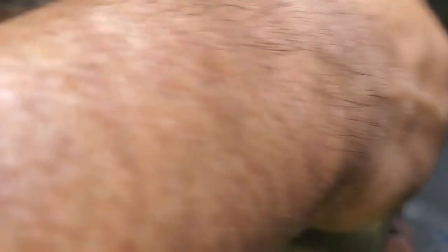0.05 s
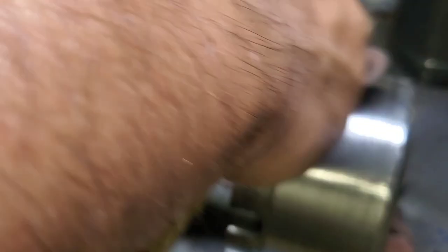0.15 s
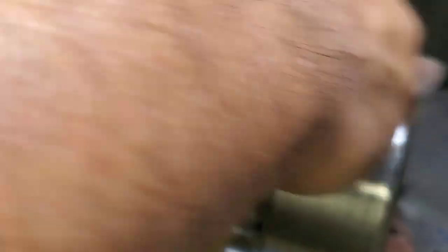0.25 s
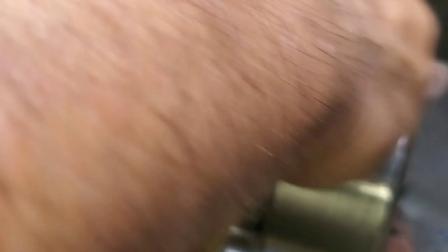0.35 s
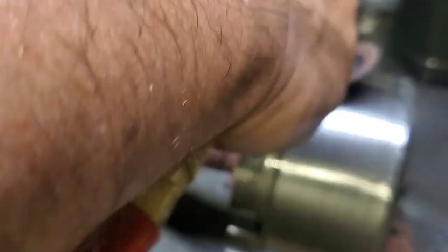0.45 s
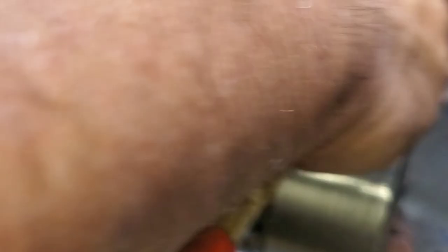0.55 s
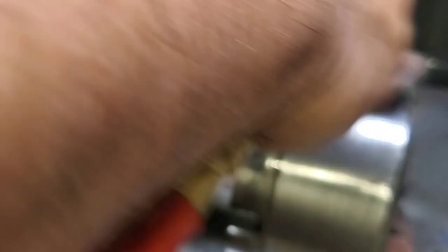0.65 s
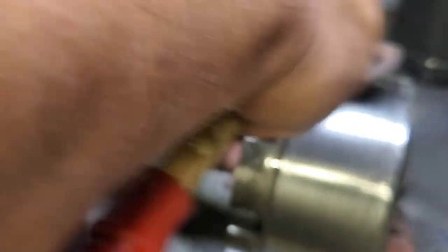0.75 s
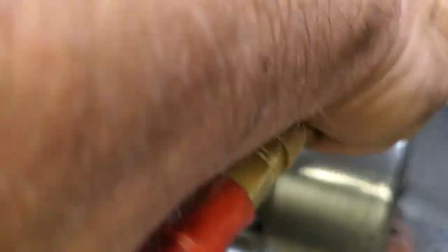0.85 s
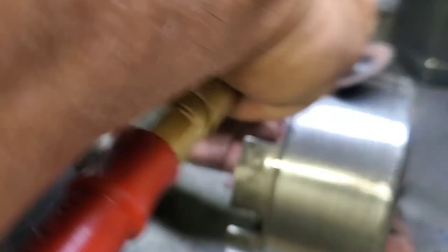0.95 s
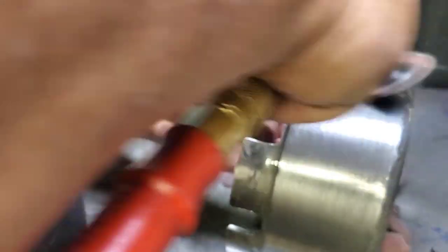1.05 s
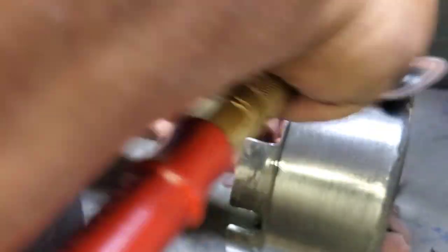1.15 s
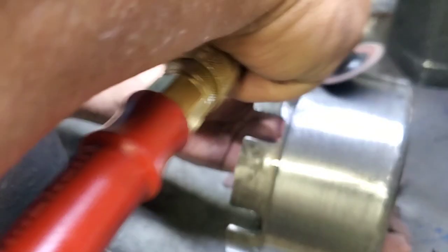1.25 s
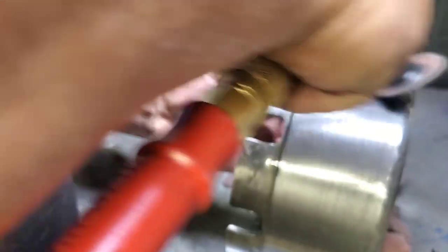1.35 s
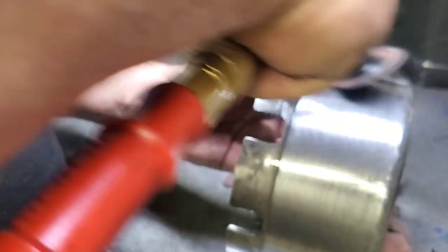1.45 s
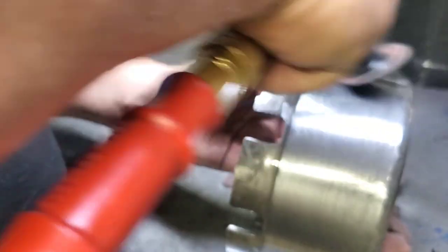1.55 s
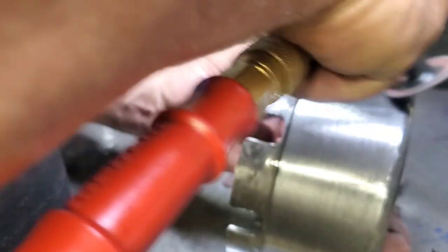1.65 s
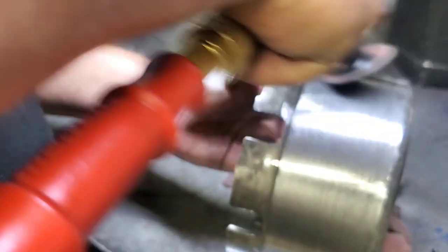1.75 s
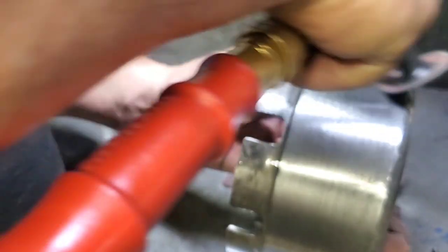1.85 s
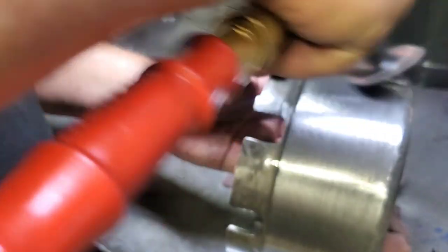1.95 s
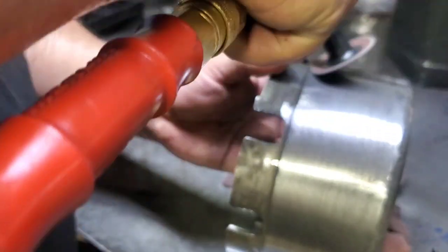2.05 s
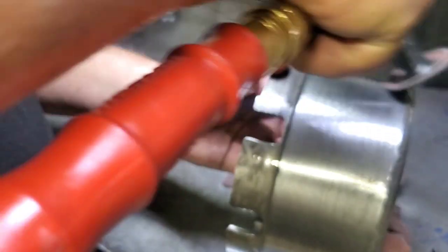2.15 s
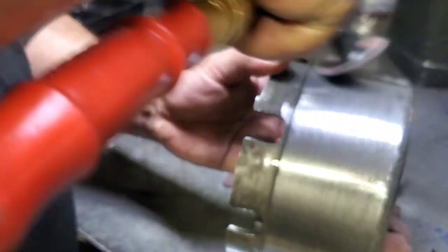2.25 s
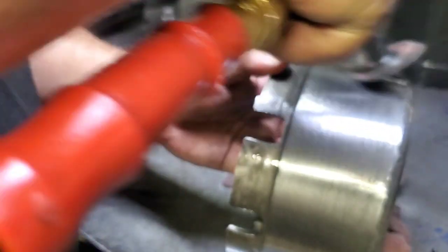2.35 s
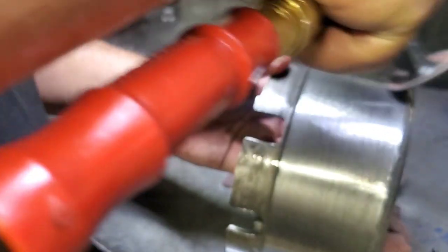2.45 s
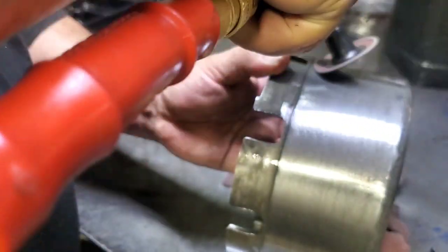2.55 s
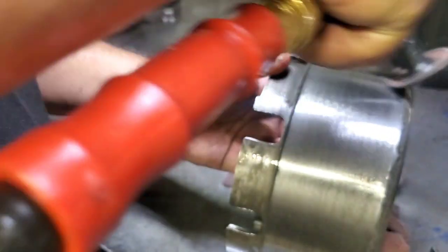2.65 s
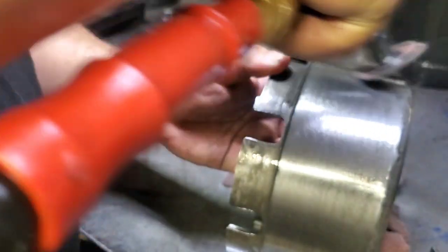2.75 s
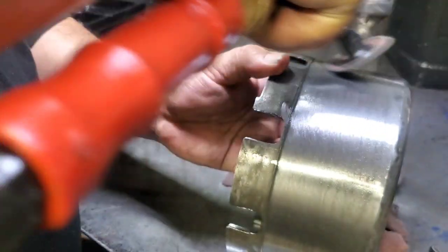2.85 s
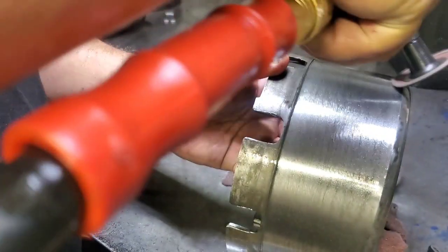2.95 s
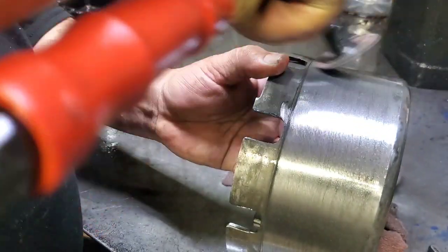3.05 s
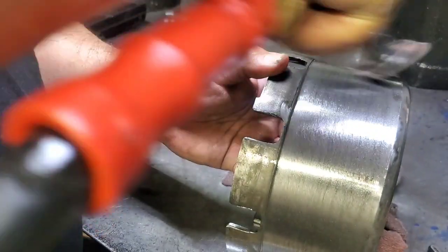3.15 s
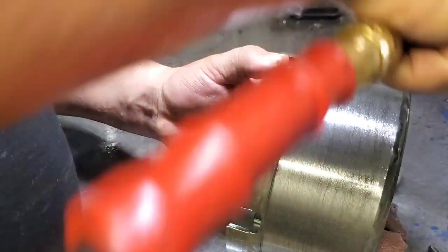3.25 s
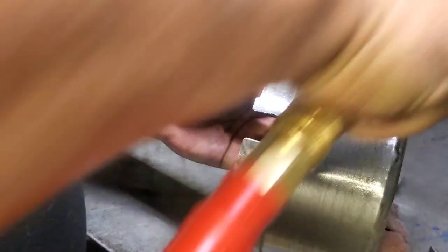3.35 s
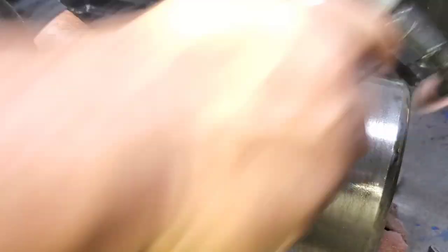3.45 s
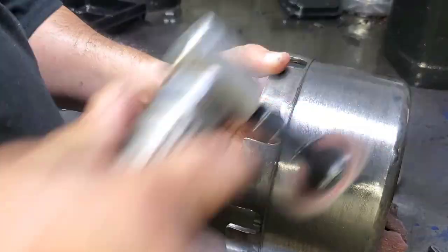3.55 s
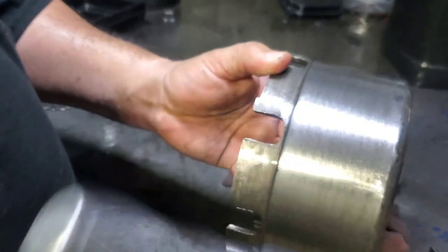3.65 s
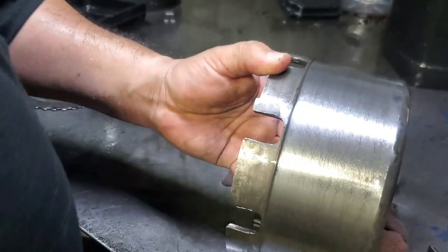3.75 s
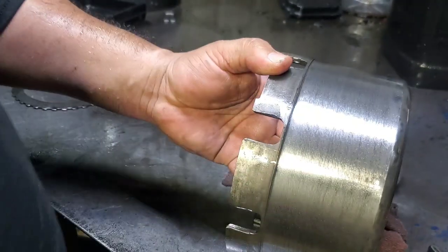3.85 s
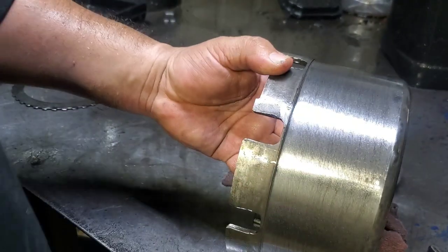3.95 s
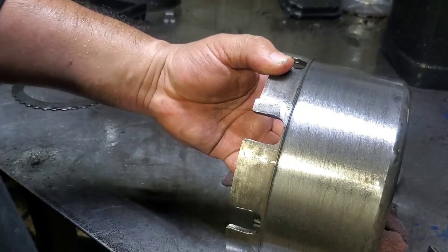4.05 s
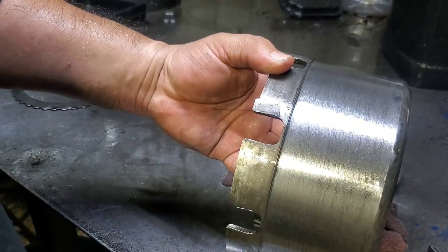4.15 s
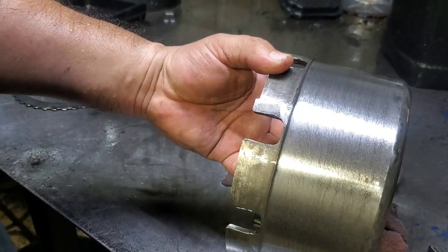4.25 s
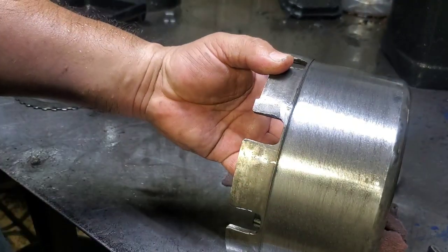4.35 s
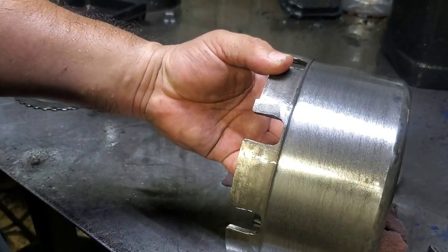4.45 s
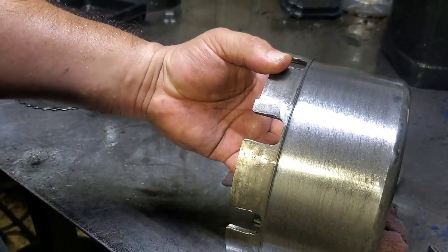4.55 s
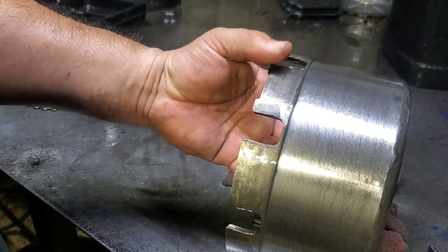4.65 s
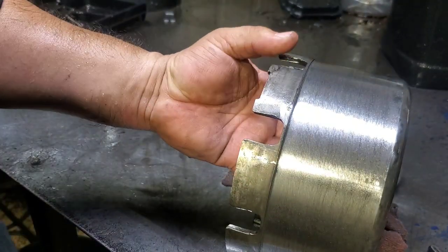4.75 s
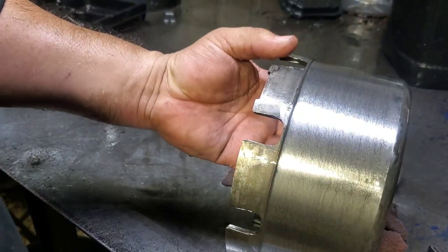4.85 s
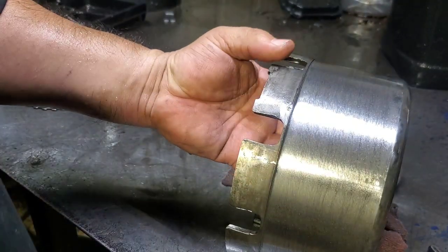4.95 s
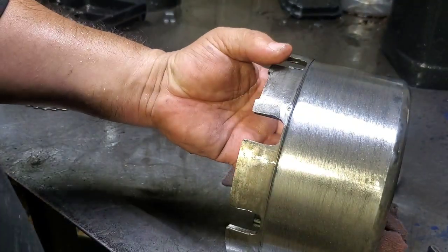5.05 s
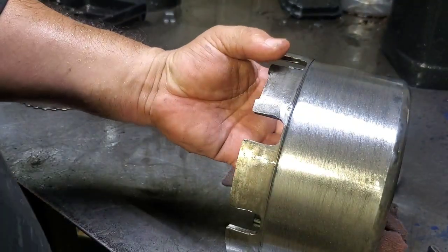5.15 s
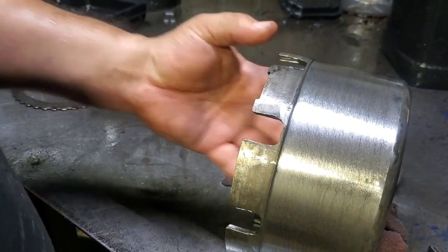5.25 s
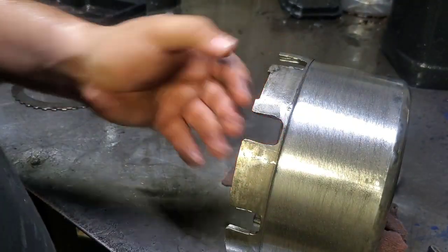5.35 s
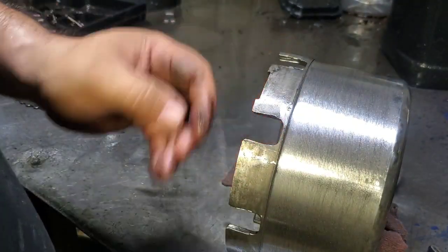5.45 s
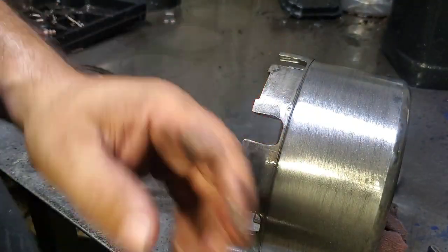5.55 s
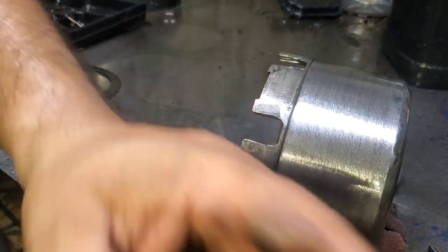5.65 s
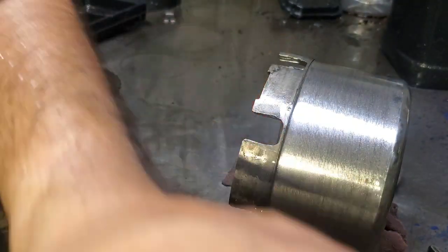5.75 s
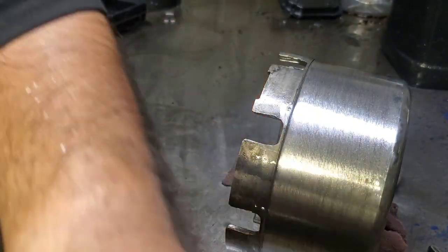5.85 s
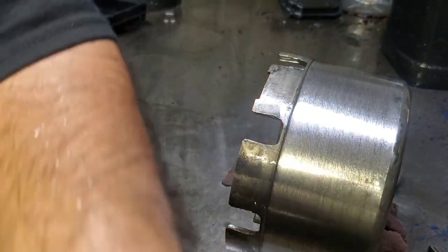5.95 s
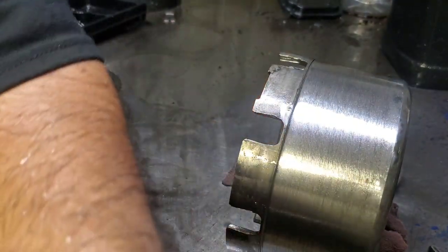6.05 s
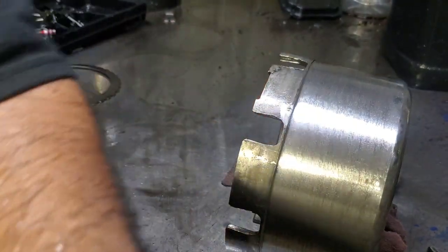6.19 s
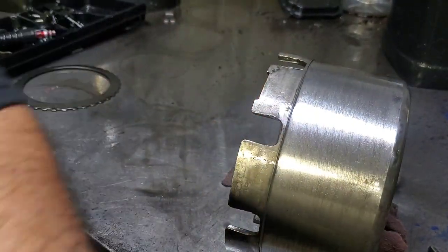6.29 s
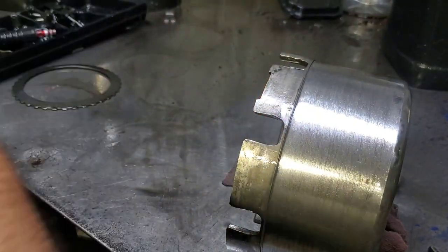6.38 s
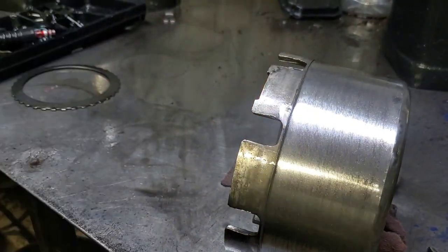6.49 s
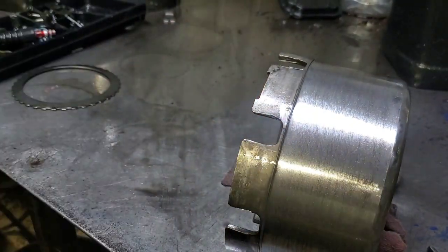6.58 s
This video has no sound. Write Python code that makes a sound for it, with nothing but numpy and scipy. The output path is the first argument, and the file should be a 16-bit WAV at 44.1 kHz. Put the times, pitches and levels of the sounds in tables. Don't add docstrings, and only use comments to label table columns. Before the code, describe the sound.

In a workshop, a hand-held air grinder sands a metal drum very close to the microphone, its raspy whine dipping in pitch with each press amid strong air hiss. After three seconds it is released, coasting down with a fading, spitting bleed. Steady leak hiss and low rumble emerge, then the tool is laid on the bench and slides grittily.

```python
import sys
import numpy as np
from scipy import signal
from scipy.fft import rfft, irfft
from scipy.io import wavfile
from scipy.ndimage import uniform_filter1d

SR = 44100
rng = np.random.default_rng(int(sys.argv[2]) if len(sys.argv) > 2 else 0)


def inscribe(sig):
    pcm = np.round(np.clip(np.atleast_2d(sig).T, -1, 1) * 32767)
    wavfile.write(sys.argv[1], SR, pcm.astype(np.int16))


def boost_factor(decibels):
    exponent = np.asarray(decibels, float) / 20
    return 10 ** exponent


N = 291942
T = np.arange(N) / SR
HZ = np.maximum(np.arange(N // 2 + 1) * SR / N, 1)
RELEASE_S, VALVE_S = 3.307, 0.0094


def rms_one(x):
    return x / np.sqrt(np.mean(x ** 2) + 1e-20)


def at_hz(points, hz):
    f, level = np.transpose(points)
    return np.interp(np.log(hz), np.log(f), level)


def step(s, span):
    return .5 + .5 * np.tanh((T - s) / span / 2)


def after(s):
    return np.maximum(T - s, 0)


def swells(rows):
    return sum(boost_factor(db) * np.exp(-.5 * ((T - s) / length) ** 2) for s, db, length in rows)


def drift(rate):
    r = np.exp(-80 * np.pi * rate / SR)
    white = rng.standard_normal(N // 40 + 2002)
    slow = signal.lfilter([1], [1, -2 * r, r * r], white)[2000:]
    return np.interp(np.arange(N) / 40, np.arange(len(slow)), rms_one(slow))


def peaks(modes, hz):
    return np.sqrt(sum(boost_factor(db) ** 2 / (1 + ((hz - f * f / hz) / w) ** 2) for f, w, db in modes))


def colour(spectrum):
    return boost_factor(at_hz(spectrum, np.minimum(HZ, 15200)))


def noise(gain, balance, likeness, lag, patchy_db, rate, count=1):
    shared, left, right = rfft(rng.standard_normal((3, N)))
    alike = np.clip(at_hz(likeness, HZ), 0, 1)
    late = shared * np.exp(-2j * np.pi * HZ * lag / SR)
    pair = np.sqrt(alike) * np.array([shared, late]) + np.sqrt(1 - alike) * np.array([left, right])
    pair = pair * gain * boost_factor(at_hz(balance, HZ) / 2 * np.array([[1], [-1]]))
    share = gain ** 2 / np.sum(gain ** 2)
    place, out = count * np.log2(HZ), 0
    for band in range(4 * count, 15 * count):
        mask = np.clip(1 - np.abs(place - band), 0, 1)
        if mask @ share > 1e-4:
            out = out + irfft(pair * mask, N) * boost_factor(patchy_db * drift(rate))
    return out / np.sqrt(np.mean(np.mean(out, axis=0) ** 2))


# t/s, level/dB, length/s
COMPRESSOR_SWELLS = [(0.25, -56, .22), (1.12, -56, .12), (1.92, -54, .1), (2.86, -62, .05),
                     (3.8, -53, 0.12), (4.15, -59, 0.12), (4.79, -38.5, .1), (5.08, -51, .07),
                     (5.5, -51, 0.11), (6.05, -45, 0.044), (6.5, -34, .09)]


def drone():
    swelling = boost_factor(-69.5) + swells(COMPRESSOR_SWELLS)
    hz = 32.6 + 1.47 * drift(4)
    return swelling * boost_factor(0.81 * drift(5)) * np.cos(2 * np.pi * np.cumsum(hz) / SR)


# f/Hz, level/dB against the hiss, wander/Hz
MACHINE_TONES = [(1020, -10.5, 2.1), (2030, -33, 6.03), (2810, -8, 14.7)]


def tones():
    out = 0
    for hz, db, wander_hz in MACHINE_TONES:
        phase = 2 * np.pi * np.cumsum(hz + wander_hz * drift(6.3)) / SR
        right_lag = 2 * np.pi * hz * 8.0 / SR
        out = out + boost_factor(db + 0.7 * drift(12)) * np.cos(phase - np.array([[0], [right_lag]]))
    return out * boost_factor([[1.5], [-1.5]])


# f/Hz, level/dB per Hz
LEAK_HISS = [(94, -47), (160, -4.5), (363, -6.5), (456, -12.5), (590, -12.5), (646, -6), (972, -6.5),
             (1050, -2), (1170, -7), (1600, -2.5), (2010, -0.5), (2770, -1.5), (3480, -6), (3980, -1),
             (6000, -20), (7800, -52), (13200, -120)]
# f/Hz, level/dB per Hz
LEAK_TREBLE = [(2940, -36), (5000, -1.5), (5690, -5.5), (6940, 1.5), (8050, -5.5), (9000, 1), (9760, -4),
               (11800, -2.5), (14100, -4.5), (15100, 0.5), (15800, -21)]
# f/Hz, level/dB per Hz
BUILDING_RUMBLE = [(26, -33), (45, 4.5), (97, 4), (113, -2), (135, -5.5), (200, -9), (260, -45.5),
                   (440, -120)]
# f/Hz, L-R level/dB
ROOM_BALANCE = [(60, -2), (110, -0.5), (200, 1.5), (380, 4), (700, 1.5), (1290, 1), (2380, 4.5),
                (4400, 3.5), (8120, 7), (15000, 6.5)]
# f/Hz, likeness/1
ROOM_LIKENESS = [(60, 1), (300, 0.95), (700, 0.4), (1400, 0.78), (3000, 0.17), (7000, 0.21), (15000, .2)]


def shop():
    recover_s, shade_s = 4.585, 6.15
    gain_db = -21.5 * (1 - step(recover_s, 0.15)) - 13 * (1 - step(3.57, 0.064))
    hiss = noise(colour(LEAK_HISS), ROOM_BALANCE, ROOM_LIKENESS, lag=13.0, patchy_db=1.5, rate=5.0, count=3)
    high = noise(colour(LEAK_TREBLE), ROOM_BALANCE, ROOM_LIKENESS, lag=12.5, patchy_db=0.3, rate=6.1, count=3)
    rumble = noise(colour(BUILDING_RUMBLE), ROOM_BALANCE, ROOM_LIKENESS, lag=3.2, patchy_db=4.0, rate=3.1)
    high_db = -37 - 14 * after(shade_s)
    rumble_db = -42.5 + 1.5 * after(recover_s)
    mix = boost_factor(-36.0) * (hiss + tones()) + boost_factor(high_db) * high + boost_factor(rumble_db) * rumble
    held_rumble = boost_factor(-61.5) * step(RELEASE_S, VALVE_S) * rumble
    return boost_factor(gain_db) * mix + held_rumble


# t/s, level/dB, centre f/Hz, length/s
BENCH_BUMPS = [
    (5.79, -34.5, 1100, 0.028),
    (6.37, -39, 170, 0.013),
    (6.372, -38.5, 800, .012),
    (2.4, -58, 138, .02),
]
# t/s, length/s, level/dB
BENCH_SLIDES = [
    (5.825, 0.21, -39),
    (6.015, 0.31, -39),
    (6.4, .3, -57),
]
# f/Hz, width/Hz, level/dB
BENCH_MODES = [(1750, 91, 2.5), (2003, 71, 2.5), (2760, 110, -1.5), (2980, 48, 1.5), (2300, 150, -7),
               (373, 17, 0)]


def bench():
    out = 0
    for s, db, hz, length in BENCH_BUMPS:
        gain = peaks([(hz, 1.7 * hz, 0)], HZ) ** 2.5
        body = noise(gain, ROOM_BALANCE, ROOM_LIKENESS, lag=6, patchy_db=2, rate=40)
        out = out + swells([(s, db, length)]) * body
    edge_s, stroke = 0.014, 0
    for s, length, db in BENCH_SLIDES:
        stroke = stroke + boost_factor(db) * (step(s, edge_s) - step(s + length, edge_s))
    balance = [(1000, 7.3), (4000, 5)]
    grit = noise(peaks(BENCH_MODES, HZ) ** 2, balance, ROOM_LIKENESS, lag=15.0, patchy_db=-0.5, rate=81)
    return out + stroke * grit


# f/Hz, level/dB per Hz
FACING_AIR = [(120, -61), (200, -34), (273, -14), (393, -18), (567, -21), (668, -22), (719, -8),
              (879, -15.5), (1760, 2), (2360, -7), (3340, -1), (4730, -11), (5780, -6), (6940, -16),
              (15800, -13.5)]
# f/Hz, level/dB per Hz
AWAY_AIR = [(120, -59), (200, -30.5), (517, -29.5), (621, -15.5), (817, -17), (1160, -14), (2190, -6),
            (2730, -2.5), (3160, -11.5), (4080, -10), (4730, -19), (5180, -34), (11400, -21.5),
            (13400, -39), (15800, -19)]
# t/s, level/dB
AIR_SPURTS = [(3.402, -43), (3.504, -37), (3.749, -36.5), (3.765, -45), (3.803, -40), (3.85, -43),
              (3.892, -46), (3.916, -47), (3.947, -51), (3.971, -47), (4.022, -49), (4.079, -49)]
# f/Hz, L-R level/dB
EXHAUST_BALANCE = [(60, 3.4), (110, 13.5), (200, 2), (380, 4.5), (700, 3.7), (1290, 3.3), (2380, 0.53),
                   (4400, 6.8), (8120, 1.5), (15000, 2.3)]
# f/Hz, likeness/1
EXHAUST_LIKENESS = [(60, 0.46), (130, 0.87), (290, 0.81), (640, 1), (1410, 0.13), (3100, 0.48),
                    (6820, -0.16), (15000, 0.059)]


def bleed():
    facing = noise(colour(FACING_AIR), EXHAUST_BALANCE, EXHAUST_LIKENESS, lag=2.0, patchy_db=3.0, rate=4.7, count=4)
    away = noise(colour(AWAY_AIR), ROOM_BALANCE, ROOM_LIKENESS, lag=11.4, patchy_db=3.0, rate=6.3, count=4)
    since = after(RELEASE_S)
    facing_gain = boost_factor(-30 - 38 * since) + boost_factor(-29.5 - 253 * since)
    away_s = 3.64
    away_db = -41 - 14 * np.maximum(away_s - T, 0) - 22 * after(away_s)
    away_db = away_db - 7 * step(4.04, 0.0052)
    spurts = swells([(s, db, 0.0021) for s, db in AIR_SPURTS])
    air = facing_gain * facing + (boost_factor(away_db) + spurts) * away
    return air * step(RELEASE_S - .01, .004)


# lifted t/s, free vane rate f/Hz, pressed t/s, loaded f/Hz, dwell under load (1 sharp - 3 long)
SANDING_STROKES = [(-0.02, 460, 0.047, 368, 1.6), (0.193, 618, 0.335, 450, 2.9),
                   (0.435, 565, 0.571, 414.6, 2.8), (0.754, 541, 0.86, 316, 1.6),
                   (0.992, 495, 1.104, 243, 1.8), (1.249, 536, 1.356, 356, 1.5),
                   (1.502, 544, 1.589, 438, 1.45), (1.775, 540, 1.883, 408, 1.3),
                   (2.048, 572, 2.153, 468, 2.4), (2.24, 552, 2.432, 400, 0.75),
                   (2.579, 534, 2.694, 396, 2.6), (2.835, 516, 2.95, 418, 1.5), (3.1, 535, 3.19, 460, 1.4),
                   (3.192, 458, 3.262, 270, 2.6)]


def speed():
    lift_s, free_hz, press_s, load_hz, dwell = np.transpose(SANDING_STROKES)
    lift_s, free_hz = np.append(lift_s, RELEASE_S), np.append(free_hz, 362)
    stroke = np.clip(np.searchsorted(lift_s, T) - 1, 0, len(SANDING_STROKES) - 1)
    top = stroke + (T > press_s[stroke])
    lifted = np.clip((T - press_s[stroke]) / (lift_s[top] - press_s[stroke]), 0, 1)
    recovery = np.sin(np.pi / 2 * lifted) ** dwell[stroke]
    hz = load_hz[stroke] + (free_hz[top] - load_hz[stroke]) * recovery
    coast = np.exp(-after(RELEASE_S) / .4)
    return uniform_filter1d(hz * coast, size=400)


# t/s, share/1
EXHAUST_FACING = [
    (0.0, 0),
    (0.6, 0),
    (0.85, 0.13),
    (1.2, 0.32),
    (1.7, 0.55),
    (2.2, 0.63),
    (2.8, 0.87),
    (3.1, 0.72),
    (3.3, 0.1),
]


def follow(law, lead_s=0.0):
    rest, per_octave, when_facing, extra = law
    mid_hz = 480
    hz = np.interp(T + lead_s, T, speed())
    octaves = np.log2(np.maximum(hz, mid_hz / 2) / mid_hz)
    facing = np.interp(T, *np.transpose(EXHAUST_FACING))
    return rest + when_facing * facing + (per_octave + extra * facing) * octaves


# f/Hz, level/dB per Hz
AIR_RASP = [(150, -36), (300, -20.5), (600, -23.5), (1000, -16), (1350, -12), (1700, -7.5), (2330, -13),
            (2800, -9.5), (3170, -3.5), (4000, -7), (4500, -10.5), (5200, -35), (6000, -60)]
# f/Hz, level/dB per Hz
ABRASIVE_GRIT = [(3600, -18), (4300, -1.5), (4800, 0.5), (5500, 2.5), (6200, -1.5), (7000, -8), (7600, -55),
                 (9000, -52)]
# f/Hz, level/dB per Hz
AIR_TREBLE = [(4120, -22), (7000, -0.5), (7730, -2.5), (11200, 3), (13400, 0), (15100, 6), (15800, -15)]
# f/Hz, level/dB per Hz
PORT_BUFFET = [(12, -28), (20, -24), (70, 4.5), (96, -1), (146, -4.5), (220, -8), (290, -28), (480, -120)]
# t/s, level/dB, length/s
PORT_GUSTS = [(0.3, -60, .2), (0.9, -53, 0.066), (1.09, -42, 0.058), (1.25, -48, .04), (1.38, -44, 0.023),
              (1.49, -44, .03), (1.64, -44, .04), (1.84, -42, 0.039), (1.95, -54, .04), (2.07, -46, .03),
              (2.25, -54, .06), (2.39, -47, 0.036), (2.64, -44, 0.041), (2.84, -34.5, 0.02),
              (3.26, -53, 0.03)]
# rest level/dB, slope/dB per octave of speed, facing level/dB, extra facing slope/dB per octave
RASP_CONTROL = (-25, 0.8, 1.3, 1)
GRIT_CONTROL = (-31.0, 3.5, 6.5, 13)
TREBLE_CONTROL = (-23.5, -0.8, 0.95, 6)


def jet():
    paths = EXHAUST_BALANCE, EXHAUST_LIKENESS
    rasp = noise(colour(AIR_RASP), *paths, lag=0.85, patchy_db=1.5, rate=2.5)
    grit = noise(colour(ABRASIVE_GRIT), *paths, lag=2.7, patchy_db=.5, rate=13)
    high = noise(colour(AIR_TREBLE), *paths, lag=2.36, patchy_db=1.5, rate=8.0)
    buffet = noise(colour(PORT_BUFFET), *paths, lag=0, patchy_db=2.0, rate=8)
    lead_s = .03
    air = boost_factor(follow(RASP_CONTROL, lead_s)) * rasp
    air = air + boost_factor(follow(GRIT_CONTROL, lead_s)) * grit
    air = air + boost_factor(follow(TREBLE_CONTROL, lead_s)) * high
    ports = (boost_factor(-59.5) + swells(PORT_GUSTS)) * buffet
    return (air + ports) * (1 - step(RELEASE_S, VALVE_S / 2))


VANE_STRENGTHS = [1.6, 0.3, -1.3, -0.9]
# multiple of the vane rate/1, level/dB
PUFF_SHAPE = [(.5, 10), (.75, 6), (1, 0), (3, 0), (4, -5), (6, -1), (9, -3)]
# f/Hz, partial level/dB
LEFT_PASSAGE = [(120, -42), (250, -32.5), (400, -25.5), (550, -21), (750, -22.5), (920, -28.5), (1120, -22),
                (1300, -29.5), (1450, -18.5), (1620, -20), (1900, -25), (2400, -35), (3200, -27),
                (4400, -35.5)]
RIGHT_PASSAGE = [(120, -43), (250, -36), (400, -29), (550, -26.5), (750, -26.5), (860, -34.5), (1120, -22),
                 (1380, -40), (1620, -25), (1800, -30), (2300, -53), (2750, -33.5), (3300, -31),
                 (4400, -39)]
# rest/dB, slope/dB per octave of speed, facing/dB, extra facing slope/dB per octave
PUFF_CONTROL = (3.0, -1.5, -4.0, -4)
TILT_CONTROL = (-0.55, 5.5, 1.76, 5.2)


def whine():
    level_db = follow(PUFF_CONTROL)
    level_db = level_db - 15.5 * step(RELEASE_S, VALVE_S / 2) - 58 * after(RELEASE_S)
    level_db = level_db - 24 * (after(3.042) - after(RELEASE_S))
    tilt = follow(TILT_CONTROL)
    moved = step(0.89, 0.086)
    shadow_db = -13 + (-2.5 + 13) * moved
    shadow_hz = 1490 + (1228 - 1490) * moved
    vane_hz = speed() * (1 + 0.00273 * drift(35.3))
    turn = 2 * np.pi * np.cumsum(vane_hz / 4) / SR
    pattern = np.abs(np.fft.fft(boost_factor(VANE_STRENGTHS))) / 4
    out = np.zeros((2, N))
    for k in range(2, 37):
        multiple = k / 4
        hz = vane_hz * multiple
        strength_db = level_db + at_hz(PUFF_SHAPE, multiple) + tilt * np.log2(multiple)
        strength_db = strength_db + shadow_db * np.exp(-(np.log(hz / shadow_hz) / 0.091) ** 2)
        jitter = .1 * multiple * drift(60)
        phase = k * turn + 2 * np.pi * rng.random() + jitter
        for side, (passage, lag_s) in enumerate([(LEFT_PASSAGE, 0), (RIGHT_PASSAGE, 7e-5)]):
            fading_db = 1.6 * np.clip(multiple, .9, 4) ** .5 * drift(20)
            gain = np.sqrt(2) * pattern[k % 4] * boost_factor(strength_db + at_hz(passage, hz) + fading_db)
            out[side] += gain * np.cos(phase - 2 * np.pi * hz * lag_s + side * 0.62 * drift(8.3))
    return out


def scene():
    return drone() + shop() + bench() + bleed() + jet() + whine()


def roll_off(x):
    return signal.sosfilt(signal.butter(12, 17090, fs=SR, output="sos"), x)


def record(dry):
    rounded = 1.466 * np.tanh(dry / 1.533)
    cut = signal.ellip(14, .5, 70, 15750, fs=SR, output="sos")
    mix = signal.sosfilt(cut, rounded)
    return roll_off(mix)


dry = scene()
out = record(dry)
inscribe(out)
```